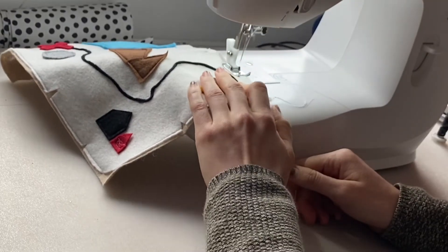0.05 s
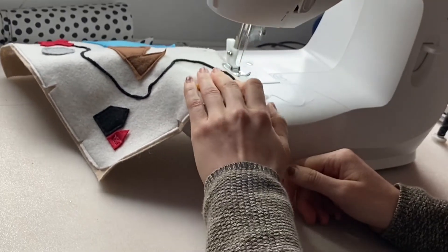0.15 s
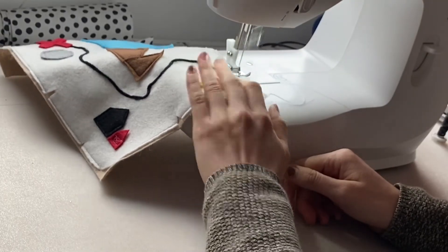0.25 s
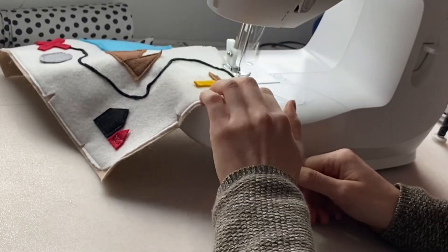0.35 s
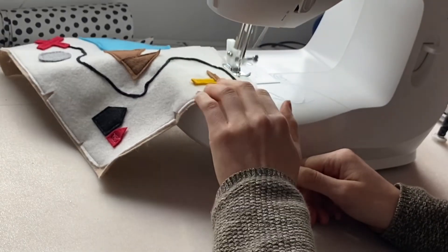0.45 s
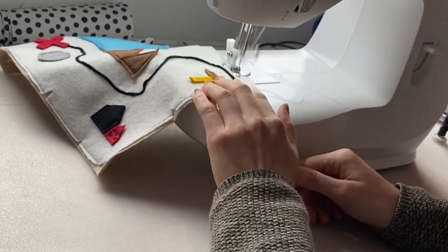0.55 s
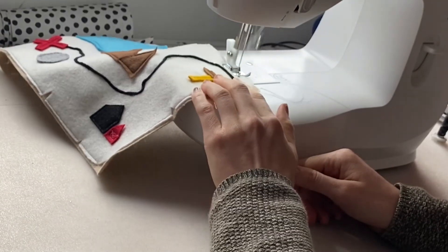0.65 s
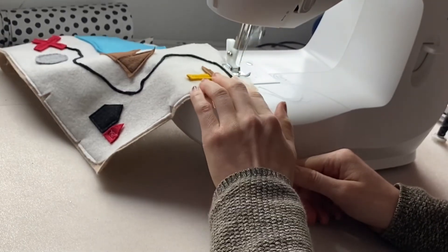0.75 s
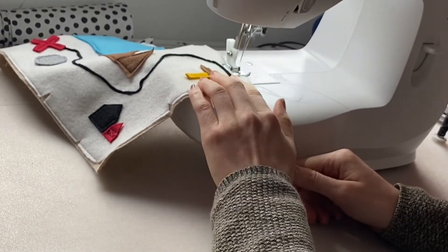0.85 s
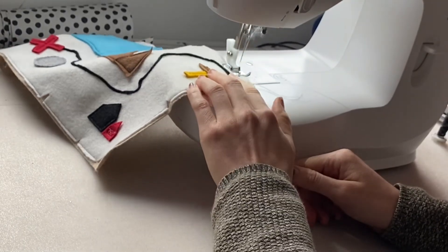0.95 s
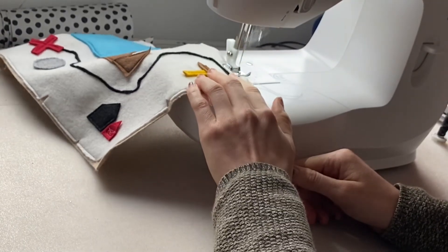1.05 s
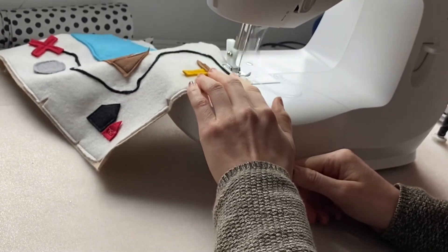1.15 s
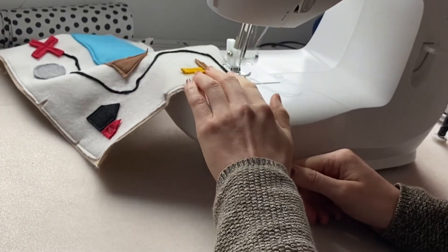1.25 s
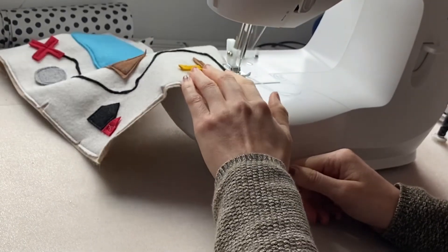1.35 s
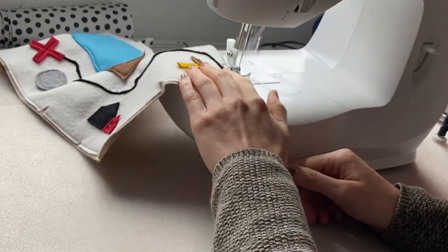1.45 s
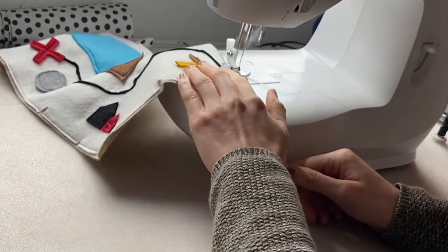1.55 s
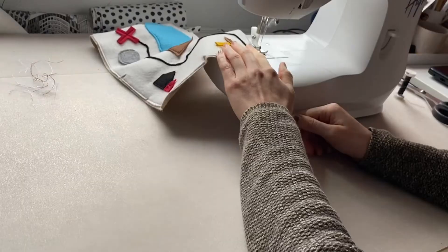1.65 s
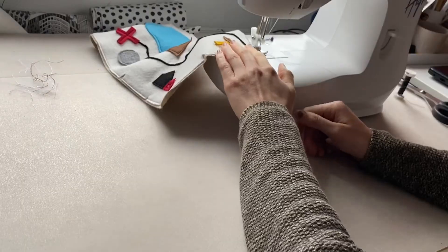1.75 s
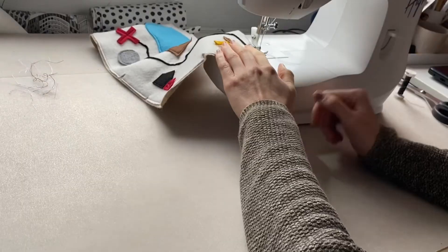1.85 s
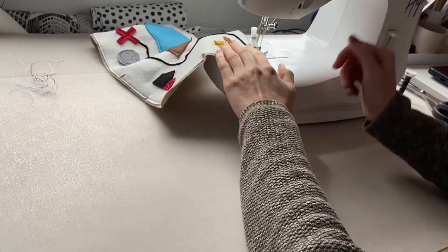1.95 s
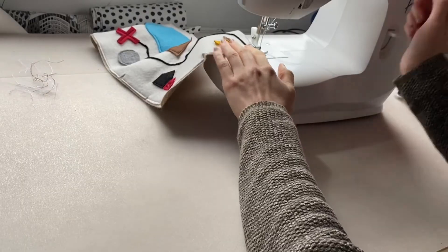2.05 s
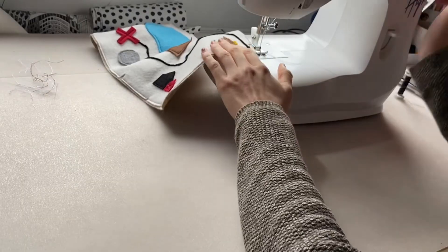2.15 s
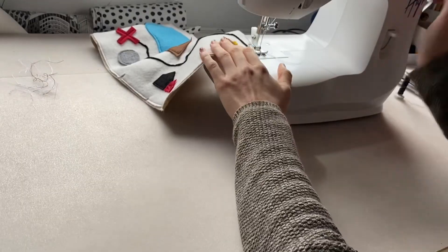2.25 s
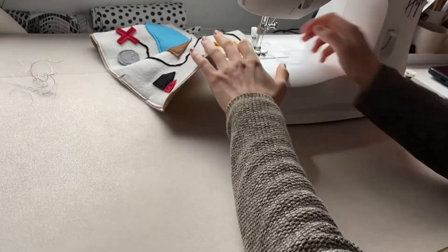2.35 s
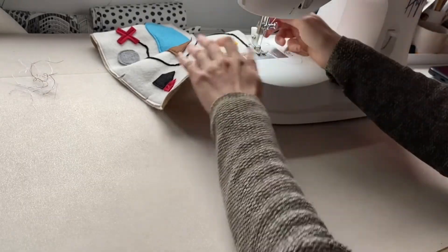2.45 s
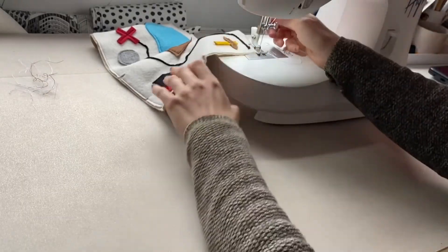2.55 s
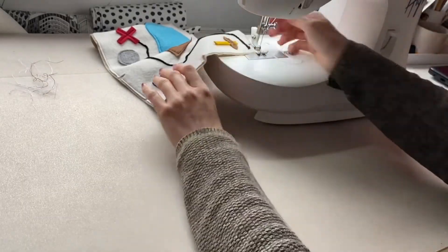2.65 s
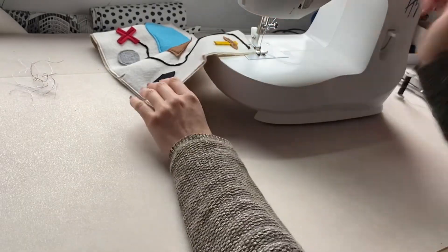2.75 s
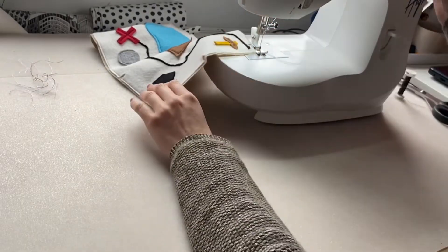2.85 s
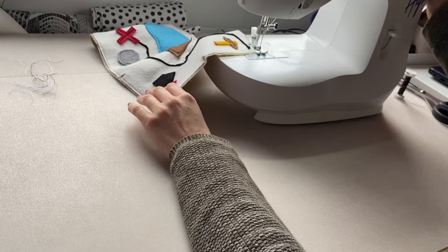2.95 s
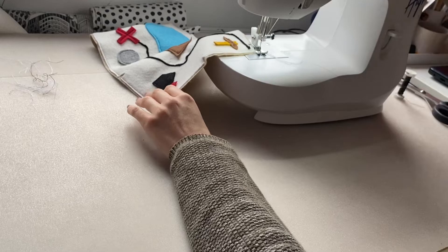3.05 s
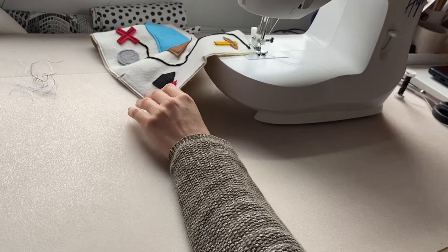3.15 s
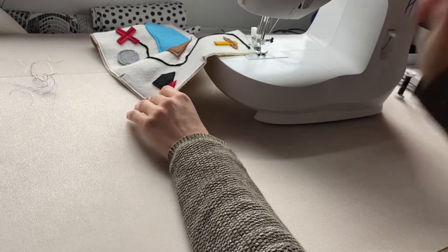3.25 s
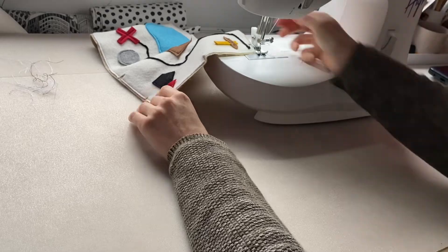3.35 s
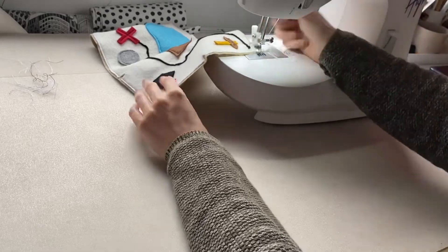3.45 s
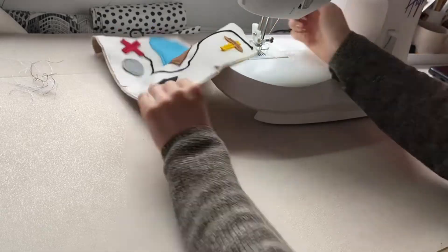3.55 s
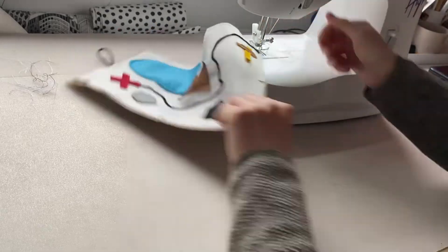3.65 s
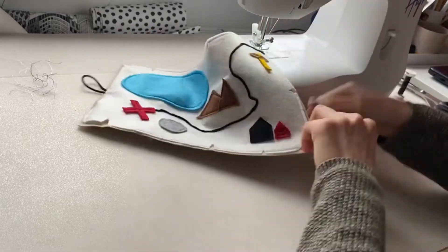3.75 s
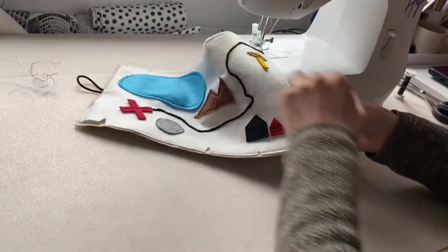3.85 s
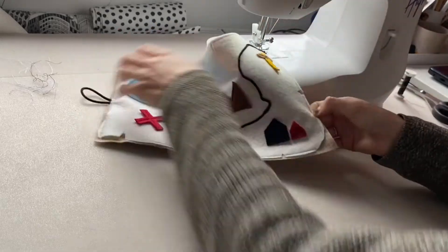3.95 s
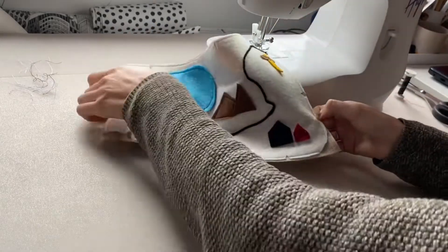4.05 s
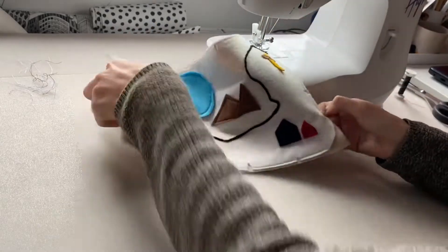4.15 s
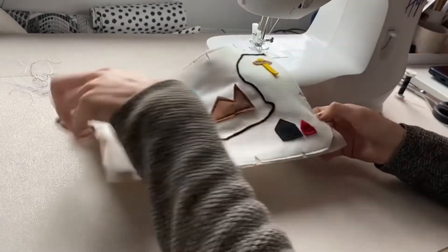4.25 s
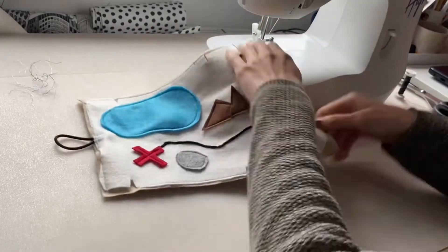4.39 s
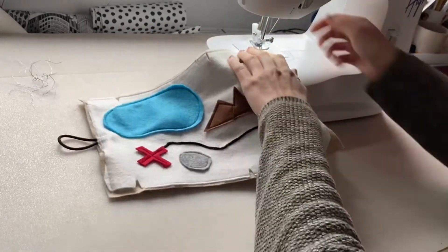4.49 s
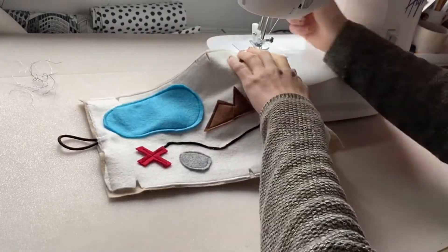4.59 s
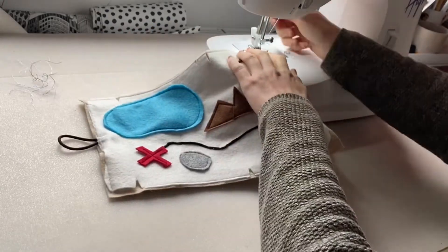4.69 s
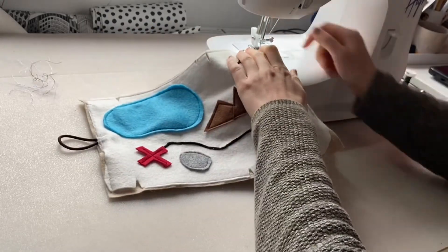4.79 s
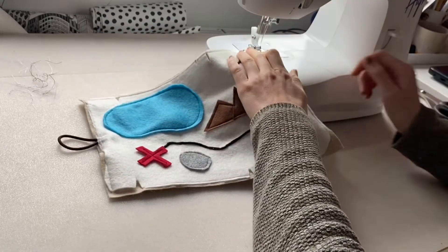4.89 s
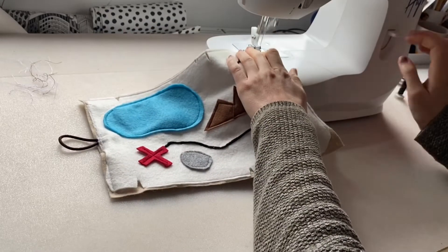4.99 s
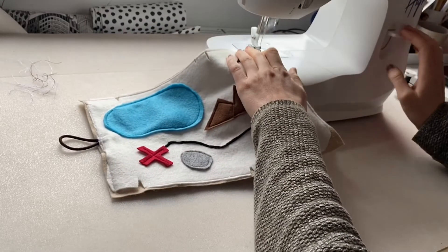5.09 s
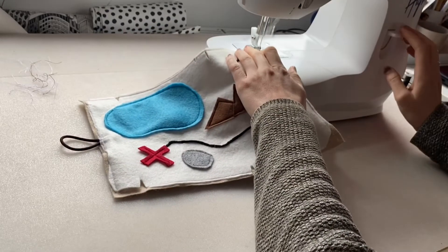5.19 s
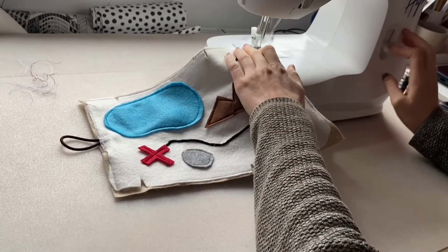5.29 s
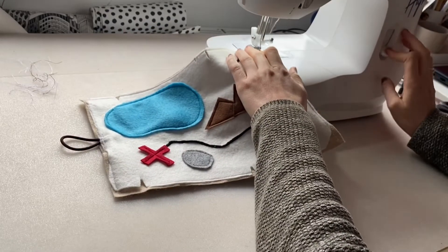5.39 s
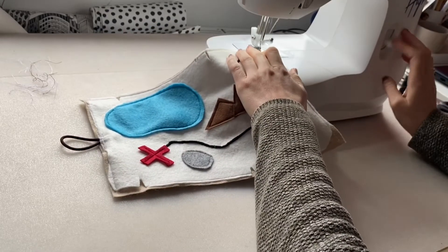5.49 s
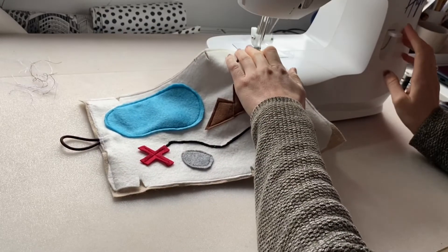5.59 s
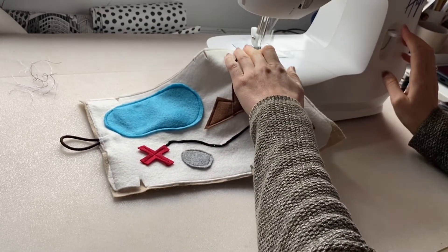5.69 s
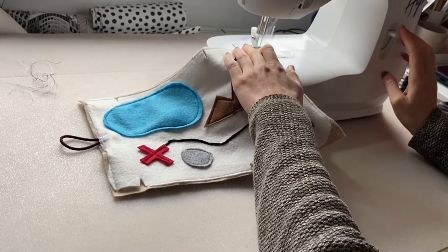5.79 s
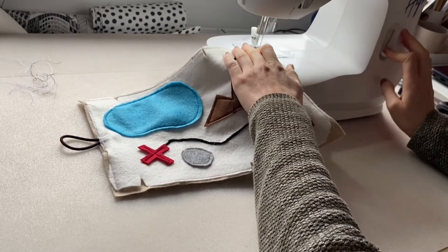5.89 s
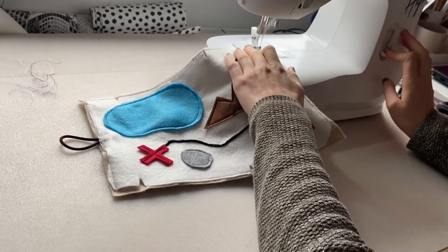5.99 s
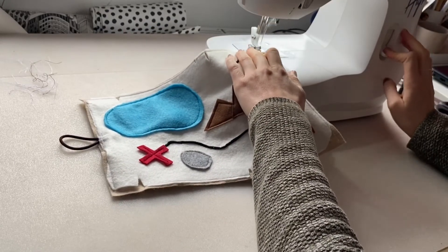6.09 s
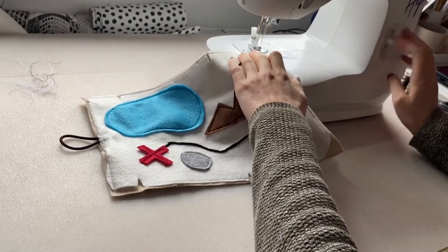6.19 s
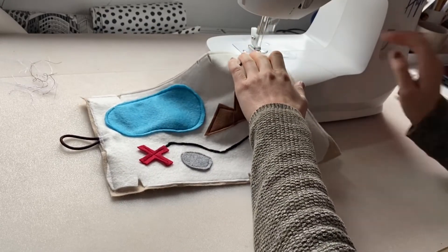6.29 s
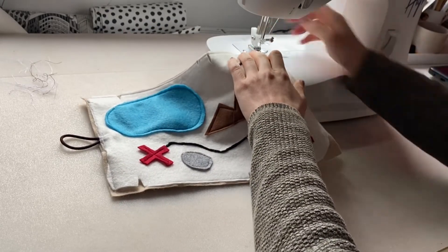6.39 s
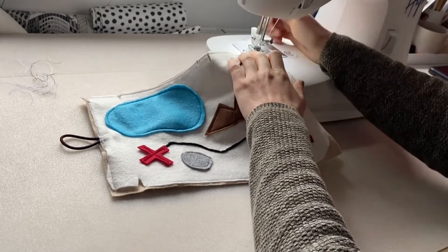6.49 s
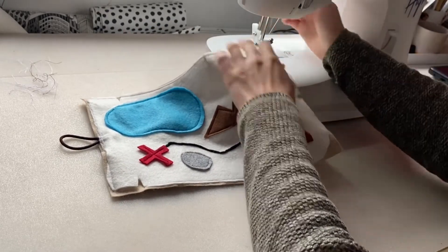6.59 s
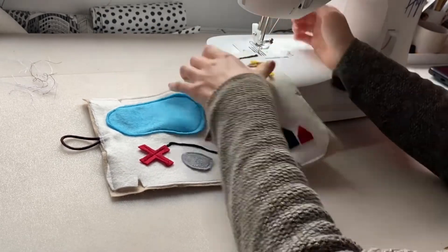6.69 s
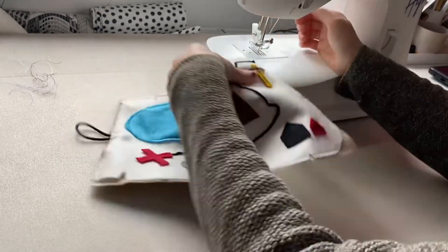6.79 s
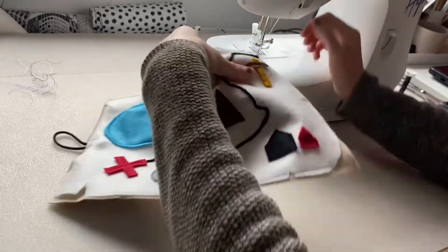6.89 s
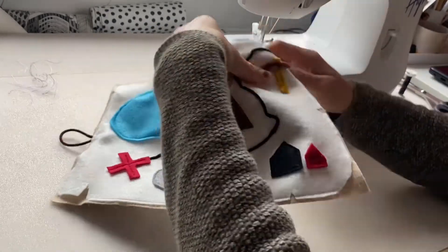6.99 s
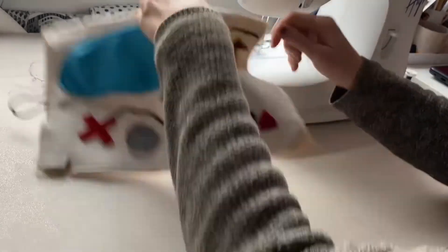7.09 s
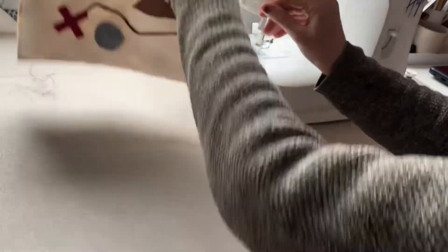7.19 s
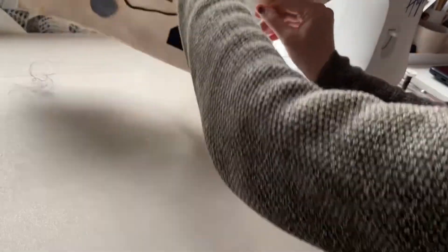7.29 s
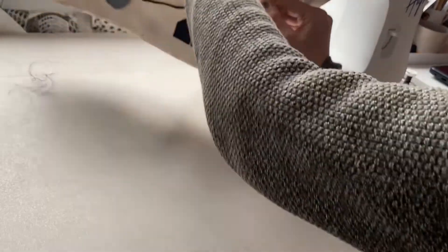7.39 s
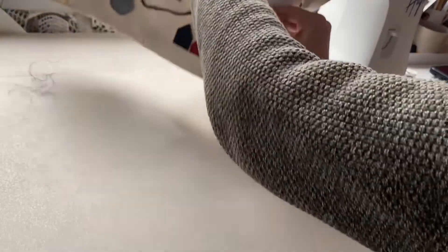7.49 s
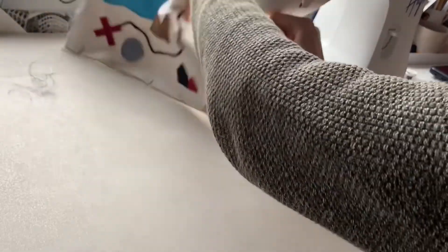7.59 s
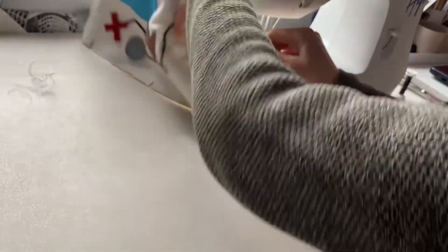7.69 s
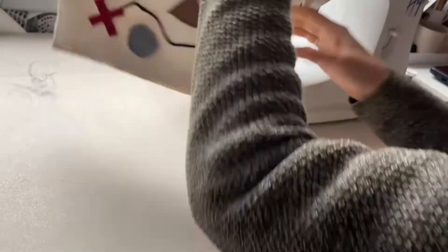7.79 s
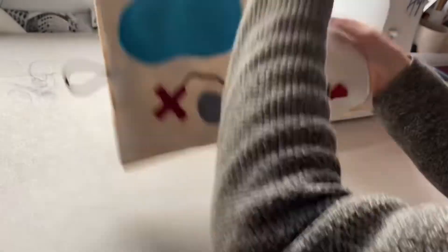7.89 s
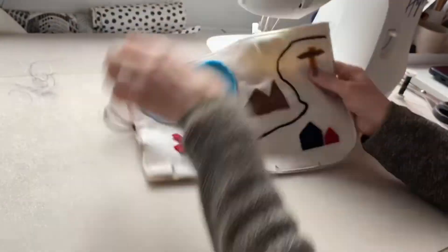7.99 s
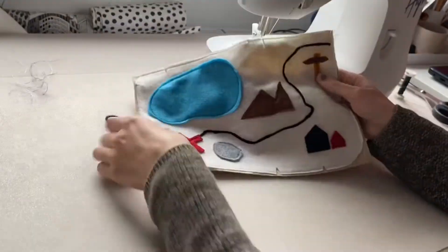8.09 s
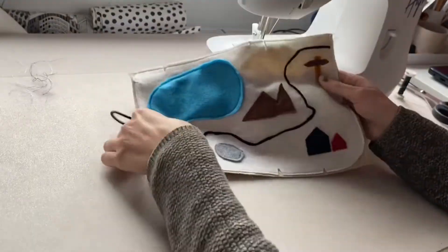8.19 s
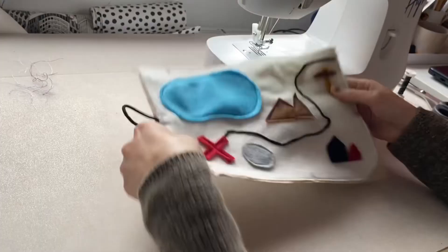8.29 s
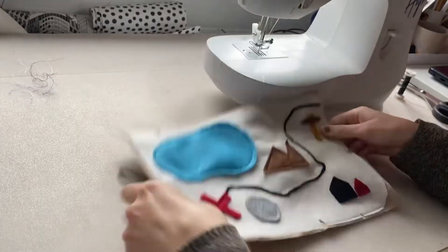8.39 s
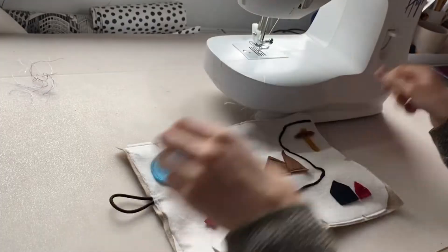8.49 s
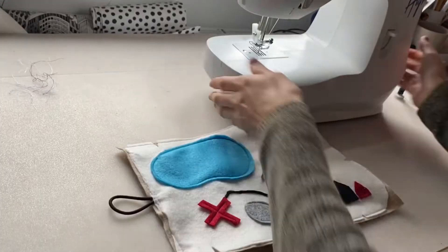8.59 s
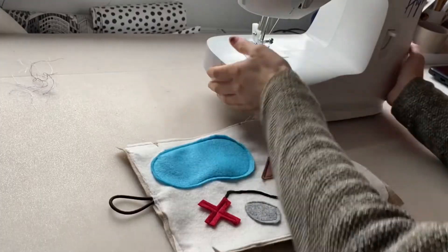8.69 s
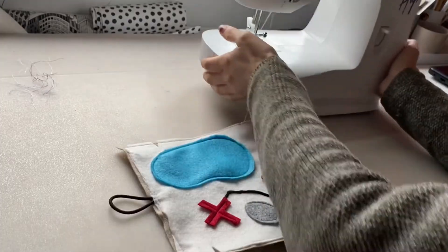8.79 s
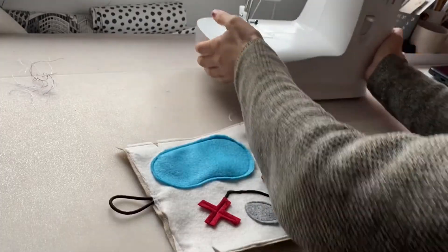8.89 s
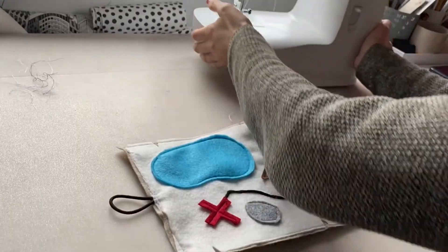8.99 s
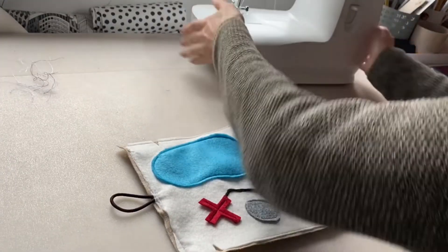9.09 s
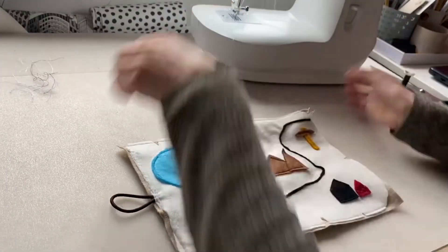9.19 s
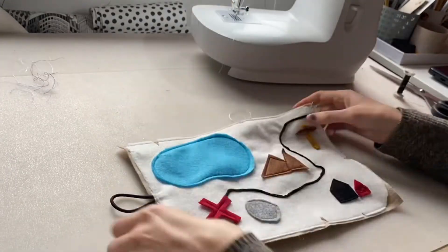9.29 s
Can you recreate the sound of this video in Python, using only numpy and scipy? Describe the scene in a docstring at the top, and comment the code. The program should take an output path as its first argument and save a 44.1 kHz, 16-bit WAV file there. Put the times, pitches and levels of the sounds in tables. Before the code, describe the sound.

Close to the microphone in a quiet, faintly humming room, an electric sewing machine rattles through two short runs of stitching, each slowing to a halt. Between them come presser lever clacks and the soft rustle of felt being turned. After the second run there are scattered clicks, dull knocks and fabric rubs, and near the end the machine slides briefly on the table.

```python
"""A quiet room, with a small electric sewing machine on a table near a phone. In two runs of stitching,
each stroke of the needle bar excites the low modes of the hollow casing, over the rattle of the works
and the whine of the motor, whose belt modulates the beat into a slow limp. Around the runs the presser
lever clacks, hands knock, felt rubs by stick-slip friction, and the machine is pushed away.
The table reflects the sound; the room reverberates, rumbles and hums."""
import sys
import numpy as np
from scipy import signal
from scipy.fft import rfft, irfft, next_fast_len
from scipy.io import wavfile
from scipy.ndimage import uniform_filter1d, map_coordinates

SR = 44100
rng = np.random.default_rng(int(sys.argv[2]) if len(sys.argv) > 2 else 0)


def master(y):
    """Save y as 16-bit WAV."""
    cut = np.clip(np.atleast_2d(y).T, -1, 1)
    pcm = np.round(cut * 32767)  # scale
    wavfile.write(sys.argv[1], SR, pcm.astype(np.int16))


N = 411891

# Shaft speed, negative meaning rest: t/s, rate/(stitches/s)
SPEED = [(0, 18.78), (1.66, 18.78), (1.73, 10.5), (1.78, 6.5), (1.83, 5), (1.92, 0), (4.74, -1),
         (4.76, 5.6), (4.83, 7), (4.91, 9), (4.97, 11.9), (5.03, 16), (5.14, 18.5), (5.22, 19.3),
         (6.17, 19.3), (6.3, 10.7), (6.35, 7), (6.4, 4.8), (6.5, 1.5)]
# Phase reference of each run: t/s of one needle thump, belt position/laps
RUN_MARKS = [(0.8134, 0.41), (5.7372, 0.11)]
# Needle-bar thumps, one list a run: t/s, level/dB
THUMP_LEVELS = [
    [(0, -47), (.07, -32.5), (.2, -36), (.35, -36.5), (.47, -44), (.56, -36.5), (.65, -43.5), (.82, -37.5),
     (.95, -35), (1.36, -36.5), (1.47, -42.5), (1.62, -51), (1.67, -38), (1.74, -63)],
    [(4.88, -41.5), (5.16, -51.5), (5.23, -31.5), (5.285, -33.5), (5.335, -44), (5.5, -44), (5.59, -34.5),
     (5.66, -41.5), (5.74, -32.5), (5.95, -32.5), (6.0, -44), (6.055, -33), (6.15, -68), (6.19, -61),
     (6.36, -69.5)],
]
# Load on the works through a stitch: phase/stitches, level/dB
CAM_LOAD = [(.1, 2.5), (.24, 0), (.32, -4.5), (.58, -4.5), (.66, 2), (.85, 0)]
# Two linkage knocks a stitch, which the belt favours in turn: phase/stitches, level/dB, swing/dB
LINKAGE = [(.63, -24, 3), (1.07, -24, -3)]
# Low modes of the hollow casing: f/Hz, level/dB, t60/s
CASING_MODES = [(260, -3, 0.15), (245.9, -9.5, 0.14), (220.7, -15, 0.12), (180.8, -13, 0.087),
                (534, -25, 0.059)]
# Resonances: f/Hz, bandwidth/Hz, level/dB
SHELL_MODES = [(544.6, 40, -7), (668, 39, -1), (793, 30, -1.5), (900, 29, -9.5), (1056, 40, -5.5),
               (1212, 43, -5), (1370, 51, -7.5), (1455.5, 59, -4), (1560, 66, -9.5), (1785, 32, -10),
               (2206, 39, -12.5), (2430, 32, -10.5), (2800, 76, -12.5), (3310, 130, -14.5),
               (4350, 180, -21.5), (4680, 260, -21), (5170, 75, -20), (6370, 140, -23.5),
               (10100, 450, -31.5)]
PLATE_MODES = [(980, 200, -1), (2110, 220, -5), (3070, 400, -11.5), (4200, 380, -6), (5560, 900, -11)]  # needle plate
SKID_MODES = [(1120, 180, -0.5), (1760, 152, 0.5), (2120, 120, 1.5), (2780, 230, -6), (3550, 180, -11),
              (6500, 5000, -25)]  # shell under a sliding edge
# Dull blows of hands and the coasting needle bar: t/s, level/dB
KNOCKS = [(2.706, -53), (3.039, -56), (3.439, -52), (3.501, -53.5), (3.993, -47.5), (4.049, -55.5),
          (4.642, -38.5), (6.206, -46), (6.287, -54), (6.35, -54), (6.406, -58), (6.496, -51.5),
          (6.56, -52.5), (7.556, -54.5), (8.641, -54.5), (8.858, -56), (8.929, -54), (8.978, -53.5),
          (9.066, -54), (9.268, -52)]
# Hard contacts: t/s, level/dB, relative low part/dB, relative sizzle/dB, note f/Hz, t60/s
CLACKS = [(1.706, -57.5, 3, -14, 1410, .07), (.622, -40.5, -12, -12.5, 780, 0.037),
          (.744, -51, 7.5, -16, 1470, .06), (4.613, -68.5, -8, -14, 790, 0.099),
          (5.094, -49.5, -0.5, -14, 1430, .05), (5.221, -45, -2, -12.5, 684, 0.043),
          (5.259, -48.5, 5.5, -17, 1060, .07), (1.8031, -56, -3.5, -12.5, 577, 0.053),
          (1.8242, -57.5, -11, -22, 720, 0.055), (2.0594, -94, 14, -8, 680, 0.056),
          (2.6793, -56, -2.5, -7.5, 653, 0.13), (2.789, -59.5, 0.5, -12, 700, 0.069),
          (2.9164, -79.5, 15, -11, 1020, 0.036), (2.9979, -58, -7.5, -13.5, 653, 0.083),
          (3.3117, -84, 15, -10, 700, 0.08), (3.377, -74.5, 1, -1.5, 1400, 0.12),
          (3.4324, -52.5, -7, -10.5, 644, 0.072), (3.9885, -60.5, 12, -9, 513, 0.09),
          (4.0044, -60, 11, -7, 1184, 0.15), (4.0493, -56.5, 8, -8.5, 1195, 0.078),
          (4.0611, -51, 3.5, -13.5, 934, 0.043), (4.2767, -49, -2, -5, 1661, 0.062),
          (4.6225, -53, -9.5, -5.5, 776, 0.24), (4.6395, -34, -7, -2.5, 534, 0.054),
          (5.5097, -34.5, -13, -11, 1430, 0.082), (5.881, -29.5, -1, -14, 1444, 0.08),
          (6.1965, -33, -11, -8.5, 1250, 0.11), (6.4542, -70, -0.5, -8, 1420, 0.079),
          (6.4918, -60.5, -3, -16, 655, 0.12), (6.545, -78.5, 7, -12, 724, 0.068),
          (7.197, -63, -13.5, -11, 1396, 0.076), (7.5236, -69, 0.5, 1, 660, 0.14),
          (7.5561, -60.5, -3.5, 2.5, 834, 0.072), (7.6366, -73, 2, -11, 1220, 0.12),
          (7.9523, -74.5, 9, -10.5, 730, 0.078), (7.993, -46, -6, -11, 1710, 0.06),
          (8.0273, -51, 3, -18, 507, 0.081), (8.104, -57, 8.5, -10, 1680, 0.072),
          (8.387, -42.5, -9.5, -5, 1898, 0.043), (8.5706, -79.5, 20.5, 3, 690, 0.043),
          (8.6417, -68, 4, -15, 667, 0.079), (8.6741, -53.5, -7, -27, 1400, 0.034),
          (8.6944, -44, 0.5, -8, 756, 0.048), (8.765, -53.5, -2.5, -7, 1400, 0.1096),
          (9.0554, -60, 7, -16.5, 640, 0.057), (6.8979, -56, -9, -11.5, 1420, 0.16),
          (7.3492, -76.5, -2.5, -2.5, 684, 0.075), (9.2575, -60, 5, -15, 1050, 0.069)]
# Felt, sleeves and the sliding machine: start/s, peak/s, end/s, level/dB, relative hiss/dB
RUBS = [(2.36, 2.4, 2.47, -89.5, 2.5), (2.604, 2.675, 2.65, -82, -2.5), (2.818, 2.83, 2.9, -82, -6.5),
        (2.882, 2.91, 2.96, -79, -15), (2.966, 3.07, 3.1, -71, -17), (3.09, 3.13, 3.18, -75, -17),
        (3.32, 3.34, 3.5, -82, -2), (3.48, 3.663, 3.62, -70, -6), (3.852, 3.883, 4.02, -74, -13.5),
        (4.07, 4.07, 4.13, -76, -3), (4.539, 4.548, 4.56, -83, -4), (6.5, 6.55, 6.61, -83.5, -21),
        (6.668, 6.8, 6.94, -71.5, -5.5), (7.455, 7.553, 7.6, -78, -16), (7.892, 7.3, 9.3, -88, -10),
        (8.562, 8.658, 8.8, -75.5, -5.5), (8.685, 8.86, 9.12, -60, -10.5), (3.785, 3.81, 3.875, -79, -9),
        (9.205, 9.225, 9.33, -81, -6)]
# Felt turned under the needle, for the plate's low modes, then its high ones: start/s, peak/s, end/s
DRAGS = [(3.55, 3.67, 3.76), (3.49, 3.6, 3.75)]
# Felt snagging on the plate: t/s, level/dB
SNAGS = [(2.932, -72), (3.087, -64.5), (3.123, -67), (3.411, -65), (3.5246, -60), (3.567, -57),
         (3.6064, -50.5), (3.6478, -51.5), (3.729, -60.5)]
# A hard edge sliding on the shell: start/s, peak/s, end/s, level/dB
SKIDS = [(3.983, 3.985, 4, -64.5), (8.068, 8.076, 8.095, -63), (8.134, 8.134, 7.88, -69),
         (8.384, 8.412, 8.44, -59), (9.254, 9.261, 9.276, -57.5), (9.272, 9.288, 9.306, -57.5)]
# Noise spectra: f/Hz, relative spectral density/dB
RATTLE_SPECTRUM = [(50, -24.5), (85, -13), (140, -14), (190, -31.5), (330, -19.5), (422, -12), (472, -4.5),
                   (664, 2.5), (956, -8), (1420, -6), (2200, -13.5), (2860, -44.5), (4840, -120)]
TICK_SPECTRUM = [(1060, -34.5), (1800, -0.5), (2470, 1), (2610, -0.5), (3270, 0.5), (7140, -10.5),
                 (10400, -13.5), (15700, -30)]
SNAP_SPECTRUM = [(1200, -22.5), (2000, -2.5), (3400, 1.5), (5500, -4), (8000, -25.5)]
SIZZLE_SPECTRUM = [(4000, -22.5), (6500, -1), (8000, -1.5), (10500, -4.5), (14000, -11), (16300, -16)]
SCRAPE_SPECTRUM = [(88, -45), (150, -1), (221, 8.5), (371, -8.5), (498, -2), (1620, -20.5), (1860, -32.5),
                   (2500, -23), (3250, -40), (5500, -120)]
HISS_SPECTRUM = [(1060, -14), (1800, -1), (2340, -3), (3630, -4), (4310, -4), (4640, -7), (7470, -9.5),
                 (15500, -24)]
RUMBLE_SPECTRUM = [(18, -49.5), (40, -22), (90, 3.5), (107, 0), (125, 2.5), (150, -10), (250, -13.5),
                   (345, -26.5), (450, -29), (684, -30), (1280, -44.5), (4910, -53.5), (16000, -57)]
# Left channel over right: f/Hz, level/dB
STEREO_TILT = [(250, 0), (600, .6), (1200, -2), (2400, -.9), (4800, 1.8), (9000, 2.4), (14000, -.4)]
# Lead of the left channel: f/Hz, phase/rad
STEREO_LEAD = [(300, 0.26), (800, 0.084), (1900, 0.92), (2330, 0.25), (3000, 0.7), (10000, .1)]
# Reverberation: f/Hz, t60/s, level/dB
REVERB = [(249, .3, -32), (501, 0.28, -19.5), (840, 0.12, -4.5), (1310, 0.087, -6), (4970, 0.15, -8),
          (9200, 0.12, -3.5), (13860, 0.088, -6.5)]
# Room rumble: t/s, level/dB
RUMBLE_LEVELS = [(0, -67.5), (2.3, -71.5), (2.44, -69), (2.55, -74.5), (2.9, -68), (3.05, -58.5),
                 (3.2, -70), (3.6, -66.5), (4.3, -70.5), (7, -70), (9.34, -67.5)]
# Room hums: f/Hz, level/dB
HUMS = [(123.8, -79), (199.2, -78), (398.4, -95)]

BELT_LAPS_PER_STITCH = .362
THUMP_SWING_DB, THUMP_LAG_CYCLES = 2, .2  # the thump is harder twice a belt lap
LIMP_DB, LIMP_LAG_CYCLES = 1.1, .66  # the belt shifts the load to and fro
RATTLE_DB, TREBLE_DB, HOLLOW_DB = -52.5, -5, -55  # at full speed; treble is relative to the rattle
RATTLE_LOSS_DB, TREBLE_LOSS_DB, HOLLOW_LOSS_DB = 4, 2, 3  # at half speed
WHINE_CYCLES_PER_STITCH, WHINE_DB, PULL_DB = 130.5, -21, 12  # relative to the rattle; rise at full pull
FULL_PULL = 20  # change of speed/(stitches/s^2)
CHOKE_S = .0091  # the mechanism bears on the casing and damps it as the next blow comes
DRAG_DB, RASP_DB = -67, 3  # felt on the plate; its unevenness
TABLE_DELAY_S, TABLE_DB, TABLE_CUTOFF_HZ = .0031, -11, 796
APPLIANCE_ON_S, APPLIANCE_OFF_S, APPLIANCE_HZ = 6.33, 8.65, 231.5
APPLIANCE_DB, APPLIANCE_FADE_DB_PER_S = -66.5, 2.4
BASS_CUTOFF_HZ, TOP_HZ = 45, 16400


def needle():
    """Periodic impact: the needle bar thumps the casing once a stitch, modulated by the belt."""
    _, stitch, belt = shaft()
    at = passes(stitch, 0)
    swing_db = THUMP_SWING_DB * np.cos(2 * np.pi * (2 * belt - THUMP_LAG_CYCLES))
    level_db = contour(*THUMP_LEVELS) + swing_db
    return thumps(list(zip(at / SR, level_db[at])), rise_s=.0086, scatter_db=2.5)


def thumps(blows, rise_s, scatter_db):
    """Damped free vibration: each blow rings the casing's modes at new strengths until the next."""
    out, t = np.zeros(N + SR), np.arange(SR // 4) / SR
    draws = rng.standard_normal((len(blows), len(CASING_MODES)))
    blows = sorted(blows)
    gaps = np.diff([s for s, db in blows], append=np.inf)
    for (s, db), gap, draw in zip(blows, gaps, draws):
        ring = sum(amp(level + scatter_db * d - 60 * t / t60) * np.sin(2 * np.pi * hz * t)
                   for (hz, level, t60), d in zip(CASING_MODES, draw))
        ring *= (1 - np.exp(-t / rise_s)) ** 2  # a padded blow starts softly
        choke = np.clip((gap - t) / CHOKE_S + .5, 0, 1)
        out[round(s * SR):][:len(t)] += amp(db) * ring / np.abs(ring).max() * choke
    return out[:N]


def motor():
    """Forced vibration: gears, cams and linkage drive the shell, more gently at low speed."""
    rate, stitch, belt = shaft()
    speed = rate / rate.max()
    slowness = (1 / np.clip(speed, .08, 1) - 1) ** 1.51  # 0 at full speed, 1 at half
    rattle_db = RATTLE_DB - RATTLE_LOSS_DB * slowness
    treble_db = TREBLE_DB - np.minimum(TREBLE_LOSS_DB * slowness, 12)
    load_db = np.interp(stitch, *np.transpose(CAM_LOAD), period=1)
    load_db += LIMP_DB * np.cos(2 * np.pi * (stitch + belt - LIMP_LAG_CYCLES))
    clatter = amp(-4) * cams(stitch, load_db) * np.sqrt(speed)
    rattle = amp(rattle_db) * (clatter + gears(load_db, treble_db))
    casing = [(hz, 2.6 / t60, db) for hz, db, t60 in sorted(CASING_MODES)]
    hollow = amp(HOLLOW_DB - HOLLOW_LOSS_DB * slowness) * noise(lambda hz: modes(casing, hz))
    return rattle + hollow + commutator(rate, rattle_db) + linkage(stitch, belt, speed, rattle_db)


def cams(stitch, load_db):
    """Impact excitation: three loosely timed contacts a stitch, and stray ones, ring the shell."""
    beats = np.diff(np.floor(3 * stitch + .72 + .06 * wobble(45)), prepend=0) > 0
    strays = rng.random(N) < 130 / SR * amp(load_db)
    return unit(struck((beats + .55 * strays) * amp(.7 * load_db), scatter_db=3.5))


def gears(load_db, treble_db):
    """Amplitude modulation: the grainy rush of the gears follows the load."""
    low = grainy(RATTLE_SPECTRUM, per_s=300, spread_db=6, grains_db=-6.5)
    high = grainy(TICK_SPECTRUM, per_s=390, spread_db=2, grains_db=-4)
    shake_db = .68 * wobble(30)
    return low * amp(load_db - 4 + shake_db) + high * amp(treble_db - 2.5 + load_db / 2 + shake_db)


def commutator(rate, rattle_db):
    """Rotational tone: pitch is proportional to speed, louder and rougher while the speed changes."""
    pull = uniform_filter1d(np.clip(np.abs(np.gradient(rate)) * SR / FULL_PULL, 0, 1), size=3000)
    pitch_hz = WHINE_CYCLES_PER_STITCH * rate * (1 + (.003 + .03 * pull) * wobble(400))
    phase = 2 * np.pi * np.cumsum(pitch_hz) / SR
    whine = np.sin(phase) + .6 * pull * np.sin(1.5 * phase)  # under load a fifth above joins
    whine *= amp(rattle_db + WHINE_DB + PULL_DB * pull + 4 * wobble(45))
    return whine + 2 * filtered(whine, lambda hz: modes(SHELL_MODES, hz))


def linkage(stitch, belt, speed, rattle_db):
    """Periodic impact: two knocks a stitch ring the shell, growing steeply with speed."""
    blows = np.zeros(N)
    for place, db, swing_db in LINKAGE:
        at = passes(stitch, place)
        level_db = db + swing_db * np.cos(2 * np.pi * belt[at]) + rattle_db[at] - RATTLE_DB
        blows[at] = amp(level_db) * speed[at] ** 3
    return struck(blows, scatter_db=1.5, length_s=.0019)


def shaft():
    """Phase as the integral of speed: returns rate/(stitches/s), phase/stitches, belt position/laps."""
    rate = np.clip(contour(SPEED), 0, None)
    turns = np.cumsum(rate) / SR
    marks, laps = np.transpose(RUN_MARKS)
    run = (np.arange(N) / SR > marks.mean()).astype(int)
    stitch = turns - turns[np.round(marks * SR).astype(int)][run]
    return rate, stitch, laps[run] + BELT_LAPS_PER_STITCH * stitch


def clacks():
    """Impact transients: a hard contact gives a snap, a sizzle, a dull puff and the part's hollow note."""
    def dull_shell(hz):
        low_modes = modes(SHELL_MODES, hz) / (1 + (hz / 2800) ** 4)
        return amp(along(RATTLE_SPECTRUM, hz) - 7.5) + low_modes

    snap, sizzle, puff, note = np.zeros((4, N + SR))
    t = np.arange(SR // 4) / SR
    attack = 1 - np.exp(-t / .00054)
    for s, db, low_db, sizzle_db, hz, t60 in CLACKS:
        span = slice(round(s * SR), round(s * SR) + len(t))
        decay = amp(-60 * t / t60)
        snap[span] += amp(db - 12.5) * (decay + 1.2 * amp(-60 * t / .012)) * attack
        sizzle[span] += amp(db + sizzle_db - 11.5) * (decay + 2.5 * amp(-60 * t / .015)) * attack
        puff[span] += amp(db + low_db - 5) * decay ** .76 * attack
        ring = decay ** (hz / 600) * np.sin(2 * np.pi * hz * t)  # higher notes die sooner
        note[span] += amp(db + low_db + 1.5) * ring * attack
    return (snap[:N] * noise(lambda hz: amp(along(SNAP_SPECTRUM, hz)))
            + sizzle[:N] * noise(lambda hz: amp(along(SIZZLE_SPECTRUM, hz)))
            + puff[:N] * noise(dull_shell) + note[:N])


def rubs():
    """Stick-slip friction: fibres catch and slip in clumps, ringing the shell and the needle plate."""
    scrape_gain, hiss_gain = np.zeros((2, N))
    for start, peak, end, db, hiss_db in RUBS:
        scrape_gain += amp(db) * stroke(start, peak, end, power=.89)
        hiss_gain += amp(db + hiss_db) * stroke(start, peak, end, power=1.3)
    slips = unit(struck(rng.random(N) < 700 / SR, scatter_db=3))
    scrape = grainy(SCRAPE_SPECTRUM, per_s=230, spread_db=6, grains_db=-10.5) + amp(-6.5) * slips
    hiss = grainy(HISS_SPECTRUM, per_s=510, spread_db=6, grains_db=-7) * amp(1.8 * wobble(70))
    rings = noise(lambda hz: np.array([modes(part, hz) for part in np.split(PLATE_MODES, [2])]))
    drag = sum(stroke(*span, power=1.5) * ring for span, ring in zip(DRAGS, rings))
    rasp = amp(DRAG_DB + RASP_DB * wobble(90)) * drag
    return rasp + amp(1.1 * wobble(35)) * (scrape_gain * scrape + hiss_gain * hiss)


def snags():
    """Impulse response: each snag of the felt is a short chatter that rings the needle plate."""
    s, db = np.transpose(SNAGS)
    hits = np.zeros(N)
    hits[np.round(s * SR).astype(int)] = amp(db + 14)
    plate = lambda hz: modes(PLATE_MODES, hz) + amp(along(HISS_SPECTRUM, hz) - 10.5)
    return filtered(bursts(hits, length_s=.0014), plate)


def skids():
    """Frictional excitation: fast slips sustain the shell's middle modes while an edge slides."""
    gain = sum(amp(db) * stroke(start, peak, end, power=.94) for start, peak, end, db in SKIDS)
    return gain * amp(1.3 * wobble(200)) * noise(lambda hz: modes(SKID_MODES, hz))


def table_reflection(x):
    """Interference: direct sound and its treble echo off the table add on the left, subtract on the right."""
    def paths(hz):
        left = amp(along(STEREO_TILT, hz) / 2) * np.exp(.5j * along(STEREO_LEAD, hz))
        echo = amp(TABLE_DB) * np.exp(-2j * np.pi * hz * TABLE_DELAY_S)
        echo /= 1 + (TABLE_CUTOFF_HZ / (hz + 1)) ** 4
        return np.array([(1 + echo) * left, (1 - echo) / left])

    return filtered(x, paths)


def reverberation(x):
    """Diffuse field: each frequency decays at its own rate, uncorrelated left and right."""
    hz, t, spectra = signal.stft(rng.standard_normal((2, SR // 3)), SR, nperseg=256)
    t60, db = along(REVERB, hz)[:, None], along(REVERB, hz, column=2)[:, None]
    tail = signal.istft(spectra * amp(db - 60 * t / t60) / np.sqrt(t60 * SR / 14), SR, nperseg=256)[1]
    return signal.fftconvolve(np.pad(x, (150, 0))[None], tail, axes=1)[:, :N]


def background():
    """Ambient noise: rumble and microphone hiss, coherent in the bass, with hums and a far appliance."""
    t = np.arange(N) / SR
    tone = lambda hz: np.sqrt(2) * np.sin(2 * np.pi * hz * t)
    mid, side = filtered(rng.standard_normal((2, N)), lambda hz: amp(along(RUMBLE_SPECTRUM, hz)))
    side = filtered(side, lambda hz: amp(along([(100, -20.5), (500, -8), (2000, -1.5)], hz)))
    rumble = unit(np.array([mid + side, mid - side]))
    hum = sum(amp(db + 1.3 * wobble(6)) * tone(hz) for hz, db in HUMS)
    running = uniform_filter1d(1. * (t > APPLIANCE_ON_S) * (t < APPLIANCE_OFF_S), size=4000)
    appliance_db = APPLIANCE_DB - APPLIANCE_FADE_DB_PER_S * (t - APPLIANCE_ON_S) + .75 * wobble(2.1)
    appliance = running * amp(appliance_db) * tone(APPLIANCE_HZ)
    return amp(contour(RUMBLE_LEVELS) + 2.6 * wobble(14)) * rumble + hum + appliance


def struck(blows, scatter_db, length_s=.0022):
    """Modal superposition: each blow excites every mode of the shell at a random strength."""
    at, drives = np.flatnonzero(blows), np.zeros((len(SHELL_MODES), N))
    drives[:, at] = blows[at] * amp(scatter_db * rng.standard_normal((len(at), len(SHELL_MODES)))).T
    each_mode = lambda hz: np.array([modes([row], hz) for row in SHELL_MODES])
    return filtered(bursts(drives, length_s), each_mode).sum(axis=0)


def grainy(spectrum, per_s, spread_db, grains_db):
    """Shot noise: sparse grains of random size in coloured noise, at rms 1 overall."""
    size = amp(spread_db * np.clip(rng.exponential(size=N), 0, 2.5))
    grains = bursts((rng.random(N) < per_s / SR) * size, length_s=.001)
    drive = rng.standard_normal(N) + amp(grains_db) * unit(grains)
    return unit(filtered(drive, lambda hz: amp(along(spectrum, hz))))


def bursts(hits, length_s):
    """Critically damped envelope: each hit becomes noise that swells for length_s, then dies."""
    pole = np.exp(-1 / (length_s * SR))
    envelope = signal.lfilter([1], np.convolve([1, -pole], [1, -pole]), hits) * (1 - pole)
    return envelope * rng.standard_normal(hits.shape)


def modes(peaks, f):
    """Resonance: the summed response of damped oscillators of alternating sign."""
    return sum((-1) ** k * amp(db) * 1j * f * width / (f0 * f0 - f * f + 1j * f * width)
               for k, (f0, width, db) in enumerate(peaks))


def noise(response):
    """Spectral shaping: white noise through a response, at rms 1."""
    return unit(filtered(rng.standard_normal(N), response))


def filtered(x, response):
    """Linear filtering: the spectrum of x times a complex frequency response."""
    size = next_fast_len(N + SR // 2)
    return irfft(rfft(x, size) * response(np.fft.rfftfreq(size, 1 / SR)), size)[..., :N]


def passes(stitch, place):
    """Phase crossings: the samples at which the shaft passes a place in the stitch."""
    return np.flatnonzero(np.diff(np.floor(stitch - place)) == 1)


def stroke(start, peak, end, power):
    """Half-sine envelope: a swell and fade between 0 and 1."""
    return np.sin(np.pi * np.interp(np.arange(N) / SR, [start, peak, end], [0, .5, 1])).clip(0) ** power


def wobble(per_s):
    """Random modulation: a smooth curve through per_s knots a second."""
    return map_coordinates(rng.standard_normal(int(N * per_s / SR) + 4), [np.arange(N) * per_s / SR])


def contour(*tables):
    """Linear interpolation of (t/s, value) tables, lowered by 60 outside their spans."""
    t = np.arange(N) / SR
    inside = np.any([(t >= rows[0][0]) & (t <= rows[-1][0]) for rows in tables], axis=0)
    return np.interp(t, *np.vstack(tables).T) - 60 * uniform_filter1d(1. - inside, size=700)


def along(table, hz, column=1):
    """Interpolation of a column on a logarithmic frequency axis."""
    columns = np.transpose(table)
    return np.interp(np.log(hz + 1), np.log(columns[0] + 1), columns[column])


def amp(db):
    """Amplitude ratio of a level in dB."""
    return 10 ** (np.asarray(db) / 20)


def unit(x):
    """Normalisation to rms 1."""
    return x / np.sqrt(np.mean(x ** 2) + 1e-20)


def scene():
    """Superposition: the machine and hands close by, their reflections, and the background."""
    near = motor() + needle() + thumps(KNOCKS, rise_s=.0047, scatter_db=1.5)
    near = near + clacks() + rubs() + snags() + skids()
    return table_reflection(near) + reverberation(near) + background()


def record(dry):
    """Band limiting: the phone's microphone loses the deep bass and passes nothing above TOP_HZ."""
    return filtered(dry, lambda hz: (1j * hz / (1j * hz + BASS_CUTOFF_HZ)) ** 2 * (hz < TOP_HZ))


dry = scene()
out = record(dry)
master(out)
```